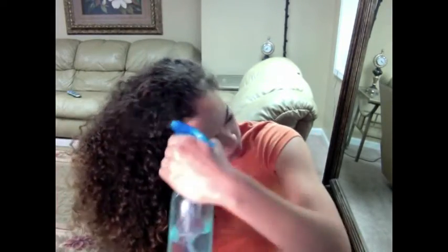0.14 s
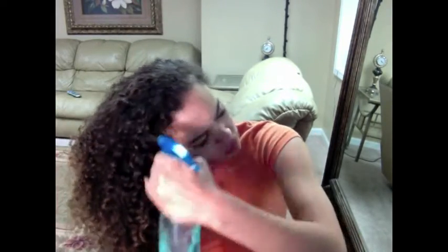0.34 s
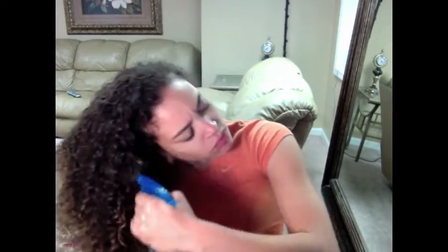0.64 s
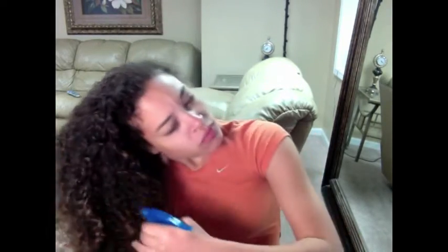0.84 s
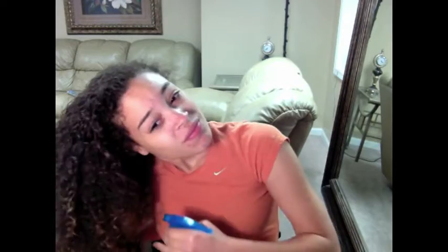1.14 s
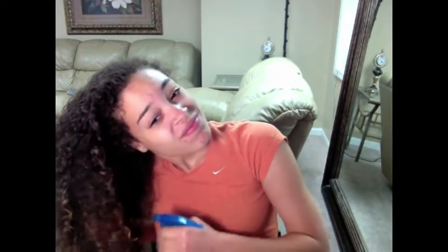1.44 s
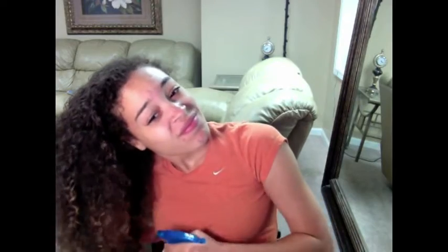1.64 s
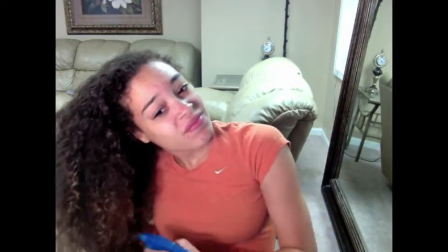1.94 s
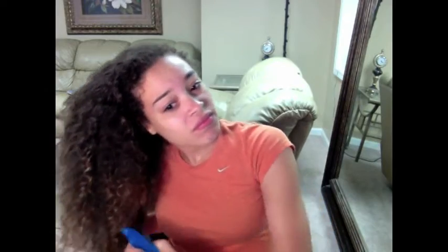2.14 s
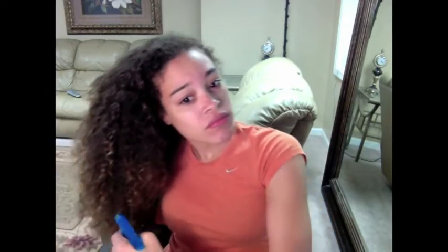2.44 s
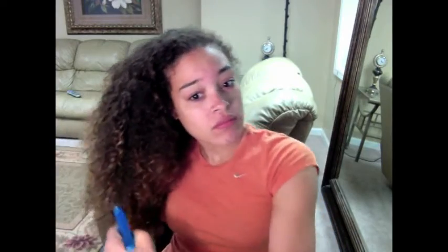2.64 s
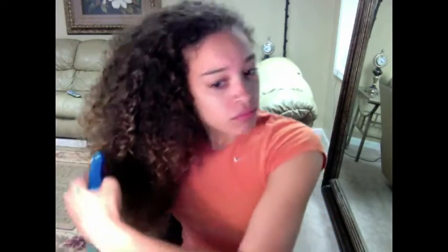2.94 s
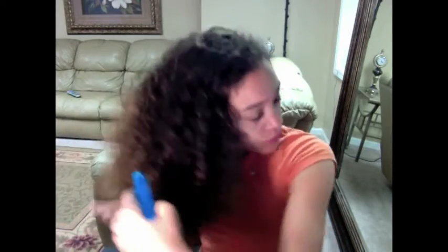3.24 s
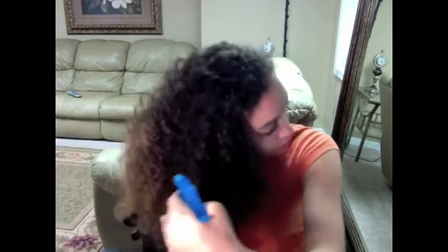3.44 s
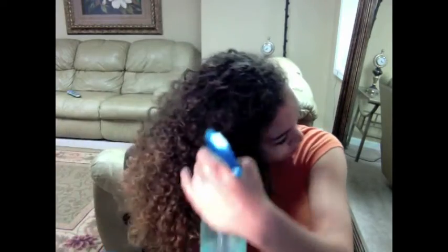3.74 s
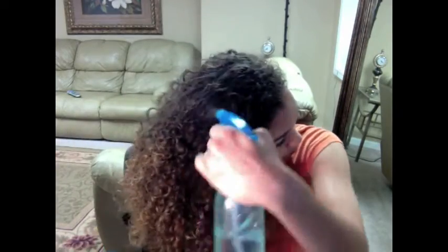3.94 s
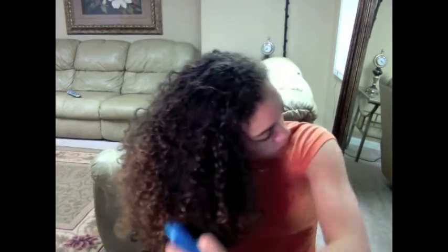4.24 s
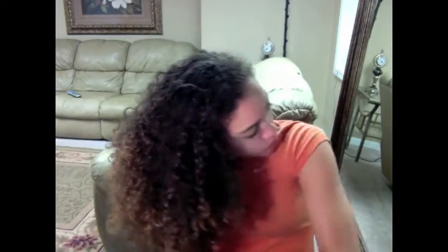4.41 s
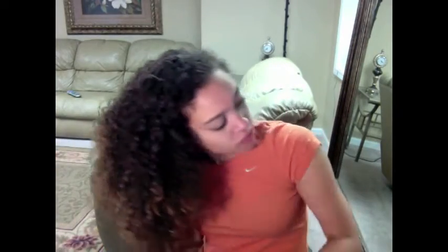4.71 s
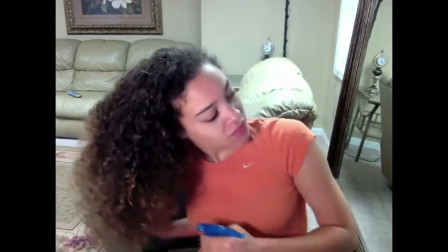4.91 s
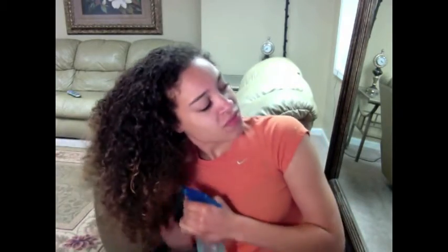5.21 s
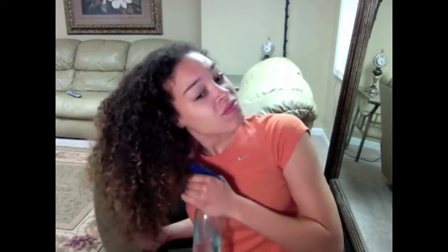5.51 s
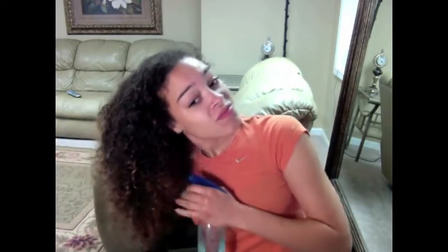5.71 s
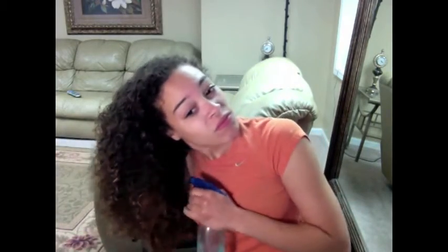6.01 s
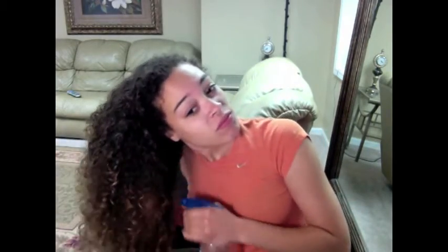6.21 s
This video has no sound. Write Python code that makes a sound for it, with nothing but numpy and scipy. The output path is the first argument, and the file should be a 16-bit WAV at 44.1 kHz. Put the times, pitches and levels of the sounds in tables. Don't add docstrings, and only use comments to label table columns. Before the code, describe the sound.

In a quiet living room, a plastic spray bottle is pumped quickly close to a small microphone. Each stroke clacks the trigger, thumps the hollow bottle and releases a short wet hiss. After about ten strokes there is a pause with soft rustling and a bump as the bottle changes hands, then a squeak and more uneven squirts. A low appliance hum stays underneath.

```python
import sys
import numpy as np
from scipy import signal
from scipy.fft import rfft, irfft, next_fast_len
from scipy.io import wavfile
from scipy.ndimage import uniform_filter1d, map_coordinates

SR = 44100
rng = np.random.default_rng(int(sys.argv[2]) if len(sys.argv) > 2 else 0)


def int16_out(signal):
    q = np.round(np.clip(np.atleast_2d(signal).T, -1, 1) * 32767)
    wavfile.write(sys.argv[1], SR, q.astype(np.int16))


def linear_from_db(decibels):
    return 10 ** (np.asarray(decibels, float) / 20)


N = 280476
TOP_HZ = 16050
BURST = 4096

# pitch_hz, level_db
ROOM_AIR = [(15, -73), (25, -39), (81, -13), (103, -13), (119, -16), (147, -6.5), (229, -11.5), (258, -15),
            (312, -9.5), (444, -17.5), (1910, -25.5), (2540, -33), (2930, -31), (3140, -26), (7000, -43),
            (9100, -65), (15400, -120)]
AIR_DB, AIR_FOLLOWS = -68.5, 0.45
# pitch_hz, level_db
FAN_WHINE = [(2780, -34), (2900, -1), (3030, -27)]
# pitch_hz, level_db
MIC_HISS = [(2000, 1), (4000, -1), (9000, -4.5), (13500, -5), (14800, -11), (15300, -24)]
HUM_HZ = 117.6
# pitch_hz, time_to_fall_60_db_s
ECHO_TIMES = [(300, 0.28), (2000, 0.28), (10000, 0.27)]

# time_s, level_db
ARM_STIR = [(0, -70), (1, -70), (2, -71.5), (2.599, -65.5), (2.8, -67.5), (2.95, -68), (3.1, -63),
            (3.2, -71), (3.3, -80), (3.5, -79), (3.8, -68.5), (4.5, -69.5), (4.7, -72.5), (4.85, -68),
            (5.1, -66.5), (5.7, -68.5), (6.101, -69), (6.36, -66.5)]
# pitch_hz, level_db
CLOTH_COLOUR = [(300, -15.5), (800, -4), (1500, -3.5), (3000, -6.5), (6000, -14.5), (10000, -23),
                (14500, -40), (15200, -50)]

# start_s, peak_db, pitch_hz
BOTTLE_KNOCKS = [(0.266, -48.5, 970), (0.537, -50, 940), (2.008, -47.5, 1990), (2.715, -49.5, 1420),
                 (3.709, -46.5, 1250), (3.974, -51, 980), (4.221, -47.5, 1210), (4.462, -47.5, 1880),
                 (4.608, -55.5, 2000), (4.672, -55, 1710), (4.735, -50.5, 1220), (5.04, -49.5, 1090),
                 (5.088, -53, 1500), (5.666, -49, 1200), (5.734, -45, 1010), (5.773, -49, 1040),
                 (5.949, -46.5, 1420), (6.105, -53, 2020)]
KNOCK_S_PER_KHZ, KNOCK_OCTAVES = 0.0085, 0.91
# start_s, peak_db, pitch_hz, length_s, width_octaves
HARD_BLOWS = [
    (.683, -28.5, 1660, 0.012, 0.62),
    (.683, -28, 3350, 0.01, .55),
    (1.3195, -28.5, 1370, .009, 0.57),
    (1.3195, -25, 2730, 0.0093, 0.66),
]
# start_s, peak_db, pitch_hz, length_s, width_octaves
HAND_BUMPS = [
    (3.0845, -34, 910, 0.0065, 1),
    (3.087, -32.5, 1335, 0.0064, 0.44),
    (3.092, -45, 330, 0.0067, 0.96),
    (3.104, -48.5, 233, 0.017, 0.81),
    (3.112, -57, 1190, 0.028, 0.55),
]

# start_s, peak_db, pitch_hz, length_s
VALVE_SPITS = [(0.0044, -39, 2960, 0.014), (0.171, -39, 10400, 0.029), (0.204, -42.5, 6700, 0.017),
               (0.395, -39, 5420, .016), (0.479, -35, 11600, 0.0064), (0.67, -35, 8100, 0.014),
               (0.72, -23.5, 7940, 0.014), (0.965, -32, 7080, 0.012), (1.584, -33.5, 6300, 0.014),
               (1.704, -41.5, 8700, 0.012), (3.6447, -25, 7580, .019), (3.713, -42, 5250, 0.022),
               (3.947, -39.5, 9200, 0.014), (4.0684, -28.5, 6600, 0.014), (4.469, -38.5, 9600, 0.0077),
               (4.897, -37, 8100, 0.011), (4.92, -32.5, 10600, .01), (4.999, -31, 9070, 0.0091),
               (5.049, -46.5, 5550, 0.018), (5.314, -29.5, 7600, 0.021), (5.3545, -40.5, 5340, 0.027),
               (5.674, -41.5, 6500, 0.0062), (5.93, -46, 9250, 0.011), (6.111, -44, 6700, .008)]
VALVE_OCTAVES = 1
# start_s, peak_db, pitch_hz
SPRING_TICKS = [(0.282, -53.5, 7870), (0.5192, -40.5, 8000), (0.552, -44, 6690), (1.036, -31.5, 9550),
                (1.431, -45.5, 8700), (1.475, -46.5, 7540), (1.673, -39, 7500), (1.753, -48.5, 6650),
                (2.021, -43, 6650), (2.254, -44.5, 6580), (2.471, -49, 7930), (2.67, -44, 7070),
                (2.7178, -41, 6580), (4.227, -42, 6770), (4.7805, -49, 6850), (4.818, -48.5, 8100),
                (5.2567, -32, 8120), (5.6171, -45.5, 5340), (5.731, -50, 6000), (5.875, -51, 8200),
                (5.892, -48, 10500), (6.22, -33.5, 8400)]
SPRING_S, SPRING_OCTAVES = 0.0091, 0.59
# start_s, peak_db, pitch_hz
HINGE_CREAKS = [(1.135, -48, 3430), (1.2, -55.5, 3070), (1.976, -50, 3010), (2.779, -47, 2950),
                (3.085, -49.5, 2560), (4.606, -67, 3300), (3.9845, -40, 4260), (4.671, -57.5, 3240),
                (4.737, -50, 3520), (4.855, -57, 3260), (5.762, -41.5, 4200)]
HINGE_S, HINGE_OCTAVES = 0.0098, 0.99
# start_s, peak_db, pitch_hz
BALL_CHIRPS = [
    (3.501, -38.5, 2200),
    (3.6, -42, 4200),
    (4.204, -49, 9700),
    (3.7, -38, 5370),
    (6.0022, -24.5, 6750),
    (6.0015, -27, 12800),
]
BALL_S, BALL_OCTAVES = 0.0095, 0.25
# start_s, level_db, start_pitch_hz, end_pitch_hz, time_to_fall_60_db_s
SEAL_SQUEAKS = [
    (3.503, -47, 2150, 2060, .2),
    (3.948, -46, 4200, 4150, .06),
]

# start_s, peak_db, bottle_thump_db, length_s
TRIGGER_CLACKS = [(0.1263, -34.5, -29, 0.019), (0.365, -37.5, -38, 0.024), (0.636, -36.5, -30, 0.021),
                  (0.9236, -37.5, -23, 0.019), (1.2438, -38, -34.5, 0.019), (1.5567, -33.5, -23.5, 0.015),
                  (1.838, -35.5, -24, 0.014), (2.087, -36.5, -23.5, 0.021), (2.312, -35.5, -20.5, 0.017),
                  (2.5482, -37, -23.5, 0.021), (3.5017, -36.5, -66, 0.0072), (3.8024, -29.5, -35, 0.0092),
                  (4.0577, -32, -27, 0.018), (4.2995, -35, -24, 0.02), (5.1543, -37, -26.5, 0.016),
                  (5.465, -36, -25.5, 0.015), (6.1928, -33, -22, 0.014)]
# pitch_hz, level_db
HEAD_COLOUR = [(470, -7.5), (800, -18.5), (1050, -4.5), (3690, -5), (5240, -0.5), (6490, -3.5), (8340, -2),
               (14700, -13.5), (16000, -31)]
# pitch_hz, width_hz, level_db
BOTTLE_TONES = [(317.7, 26, 5.5), (531, 48, 0.5), (654, 25, -1.5), (1040, 30, 3), (1420, 23, -14),
                (1550, 135, -0.5), (2054, 35, -3.5), (2380, 100, -10)]
TILT_DB, TILT_PER_THUMP = -0.5, -0.014

# start_s, swell_s, hold_s, hiss_db, wet_over_hiss_db
MIST_SQUIRTS = [(-.03, 0.02, .031, -48.5, -1), (0.125, 0.011, 0.06, -55, -8.5),
                (0.387, 0.019, .07, -55, -7), (0.662, 0.028, .062, -47, -1.5),
                (0.931, .046, .06, -51.5, 1.2), (1.259, .068, .055, -50.5, 4.5),
                (1.565, .04, .05, -50, 0.9), (1.853, .028, .04, -52, 3.5), (2.101, .044, .034, -53, 1.9),
                (2.323, .032, 0.02, -55.5, 4), (2.562, 0.028, 0.025, -57, 0.5),
                (3.5, 0.088, 0.089, -56.5, -1), (3.805, .047, .047, -53.5, 1.4),
                (4.08, 0.019, .05, -52.5, -1.5), (4.306, 0.039, .028, -55.5, 3.1),
                (4.821, 0.1, 0.031, -48, -1.8), (5.155, .067, 0.051, -53, 3.3),
                (5.475, 0.054, 0.056, -54.5, 0.7), (5.744, 0.018, .006, -58.5, 7),
                (5.893, .075, 0.041, -51.5, -1), (6.201, .043, 0.048, -50.5, 3)]
# pitch_hz, level_db
WET_COLOUR = [(600, -26), (1000, -4), (1500, -0.5), (2200, 4.5), (3000, 2), (4500, 2), (7000, -4),
              (12000, -20.5)]
# pitch_hz, level_db
HISS_COLOUR = [(2500, -9.5), (4500, -12.5), (6500, 1.5), (9000, -2.5), (12000, -6.5), (14500, -16),
               (16000, -15)]
# pitch_hz, width_hz, boost_db
NOZZLE_TONES = [(1426, 86, 8.5), (3070, 50, 2), (4180, 100, 2), (5300, 70, 5), (6990, 90, -1),
                (8540, 370, 0.5), (9800, 620, 3)]
SAG_S = 0.22


def unit(x):
    return x / np.sqrt(np.mean(x ** 2, axis=-1, keepdims=True) + 1e-20)


def along(points, hz):
    f, level_db = np.transpose(points)
    return np.interp(np.log(hz + 1), np.log(f + 1), level_db, left=-120, right=-120)


def wobble(rate):
    knots = rng.standard_normal(int(N * rate / SR) + 4)
    return map_coordinates(knots, [np.arange(N) * rate / SR])


def filtered(x, response):
    m = next_fast_len(x.shape[-1] + 8192)
    spectrum = rfft(x, m) * response(np.fft.rfftfreq(m, 1 / SR))
    return irfft(spectrum, m)[..., :x.shape[-1]]


def resonance(f, centre, width):
    return 1j * f * width / (centre ** 2 - f * f + 1j * f * width)


def rush(spectrum, patchy_db, size=8):
    z = signal.stft(rng.standard_normal(N + 512), nperseg=256)[2]
    field = uniform_filter1d(rng.standard_normal(z.shape), size=2, axis=0)
    field = uniform_filter1d(field, size=size, axis=1)
    patches = signal.istft(z * linear_from_db(patchy_db * field / field.std()), nperseg=256)[1][:N]
    return unit(filtered(patches, lambda hz: linear_from_db(along(spectrum, hz))))


def rattle(length, rise, fall):
    t = np.arange(BURST) / SR
    held = np.abs(length)[:, None]
    bumps = uniform_filter1d(rng.standard_normal((len(held), BURST)), size=90, axis=1)
    fade_db = 60 * np.clip(t - held, 0, None) / fall + 3 * t / held
    return (1 - np.exp(-t / rise)) ** 2 * linear_from_db(2 * unit(bumps) - fade_db)


def placed(times, bursts):
    starts = np.round(np.asarray(times) * SR).astype(int).clip(0)
    at = starts[:, None] + np.arange(BURST)
    return np.bincount(at.ravel(), bursts.ravel(), N + BURST)[:N]


def stir_db():
    return np.interp(np.arange(N) / SR, *np.transpose(ARM_STIR))


def room_tone():
    phase = 2 * np.pi * np.cumsum(HUM_HZ + 1.57 * wobble(7.1)) / SR
    hum = linear_from_db(-66 + wobble(3.8)) * np.sin(phase)
    stir = uniform_filter1d(stir_db(), size=SR // 4) - stir_db().mean()
    air_db = AIR_DB + AIR_FOLLOWS * stir + 0.2 * wobble(0.88)
    air = linear_from_db(air_db) * rush(ROOM_AIR, patchy_db=0.55)
    whine = linear_from_db(-87.5) * rush(FAN_WHINE, patchy_db=-4)
    hiss = linear_from_db(-85) * rush(MIC_HISS, patchy_db=-4)
    return hum + whine + air + hiss


def walls(x):
    hz, t, z = signal.stft(rng.standard_normal(SR // 2), SR, nperseg=256)
    t60 = np.interp(hz, *np.transpose(ECHO_TIMES))[:, None]
    tail = signal.istft(z * linear_from_db(-60 * t / t60), SR, nperseg=256)[1]
    return signal.fftconvolve(x, tail / np.linalg.norm(tail))[:N]


def rustle():
    level_db = stir_db() + 1.4 * wobble(19)
    return linear_from_db(level_db) * rush(CLOTH_COLOUR, patchy_db=1.2)


def taps(table, ring_db, ring_hz, rise, fall, crack_db):
    s, db, centre, length, octaves = (c[:, None] for c in np.transpose(table))
    chatter = rng.standard_normal((len(s), BURST))
    spread = rng.uniform(-1.5, 1.5, (len(s), 6)) * (np.arange(6) > 0)
    parts = centre * 2 ** (octaves * spread)
    strengths = [1, 0.6, 0.6, 0.5, 0.5, 0.5]

    def colour(f):
        broad = np.exp(-0.5 * (np.log2((f + 1) / centre) / octaves) ** 2)
        rings = sum(g * resonance(f, p[:, None], ring_hz) for p, g in zip(parts.T, strengths))
        return broad * (1 + linear_from_db(ring_db) * rings)

    body = unit(filtered(chatter, colour)) * rattle(length[:, 0], rise, fall)
    cycles = np.arange(BURST) / SR * centre - 2
    crack = linear_from_db(crack_db) * np.sin(2 * np.pi * cycles) * np.exp(-2 * cycles ** 2)
    return placed(s[:, 0] - 0.002, linear_from_db(db - 8.5) * (body - crack))


def bottle_contacts():
    light = [(s, db, hz, KNOCK_S_PER_KHZ * hz / 1000, KNOCK_OCTAVES) for s, db, hz in BOTTLE_KNOCKS]
    knocks = taps(light, ring_db=8, ring_hz=120, rise=0.0012, fall=0.04, crack_db=3)
    blows = taps(HARD_BLOWS, ring_db=2, ring_hz=300, rise=0.0005, fall=0.025, crack_db=12)
    bumps = taps(HAND_BUMPS, ring_db=12, ring_hz=90, rise=0.002, fall=0.05, crack_db=2)
    return knocks + blows + bumps


def pump_ticks():
    valve = [(*row, VALVE_OCTAVES) for row in VALVE_SPITS]
    spring = [(*row, SPRING_S, SPRING_OCTAVES) for row in SPRING_TICKS]
    hinge = [(*row, HINGE_S, HINGE_OCTAVES) for row in HINGE_CREAKS]
    ball = [(*row, BALL_S, BALL_OCTAVES) for row in BALL_CHIRPS]
    parts = valve + spring + hinge + ball
    return taps(parts, ring_db=11, ring_hz=220, rise=0.0018, fall=0.035, crack_db=0)


def squeak():
    s, db, start_hz, end_hz, t60 = (c[:, None] for c in np.transpose(SEAL_SQUEAKS))
    t = np.arange(BURST) / SR
    pitch = end_hz + (start_hz - end_hz) * np.exp(-t / 0.02) + 60 * wobble(300)[:BURST]
    level_db = db - 60 * t / t60 + 2.5 * wobble(200)[:BURST]
    note = np.sin(2 * np.pi * np.cumsum(pitch, axis=1) / SR) * linear_from_db(level_db)
    return placed(s[:, 0], note * signal.windows.tukey(BURST, 0.06))


def clacks():
    s, db, thump_db, length = np.transpose(TRIGGER_CLACKS)
    tilt_db = TILT_DB + TILT_PER_THUMP * (thump_db - thump_db.mean())
    chatter = rng.standard_normal((len(s), 2, BURST))
    grip = rng.standard_normal((len(s), 40))

    def head(hz):
        uneven_db = 4 * np.array([np.interp(hz, np.linspace(0, TOP_HZ, len(g)), g) for g in grip])
        tilted_db = tilt_db[:, None] * np.log2((hz + 1) / 4000)
        return linear_from_db(along(HEAD_COLOUR, hz) + uneven_db + tilted_db)

    def wall(f):
        return sum((-1) ** k * linear_from_db(d) * resonance(f, c, w) for k, (c, w, d) in enumerate(BOTTLE_TONES))

    plastic = unit(filtered(chatter[:, 0], head)) * rattle(length, rise=0.0036, fall=0.081)
    thump = filtered(chatter[:, 1] * rattle(0.36 * length, rise=0.00068, fall=0.061), wall)
    thump = thump / np.abs(thump).max(axis=1, keepdims=True)
    on_head = placed(s - 0.006, linear_from_db(db - 7)[:, None] * plastic)
    on_wall = placed(s + 0.003006, linear_from_db(db + thump_db + 18)[:, None] * thump)
    return on_head + on_wall


def droplets(pressure, count, size_db):
    draws = rng.uniform(size=(count, 3))
    at = np.searchsorted(np.cumsum(pressure) / pressure.sum(), draws[:, 0]).clip(0, N - 1)
    pitch_hz = 4000 + 10500 * draws[:, 1:2]
    t = np.arange(BURST) / SR
    pings = np.sin(2 * np.pi * pitch_hz * t) * (1 - np.exp(-t / 0.002)) * np.exp(-t / 0.005)
    strength = pressure[at] * linear_from_db(size_db + 10 * draws[:, 2])
    return placed(at / SR, pings * strength[:, None])


def mist():
    s, swell, hold, hiss_db, over_db = (c[:, None] for c in np.transpose(MIST_SQUIRTS))
    t = np.arange(N) / SR - s
    growth = np.sin(np.pi / 2 * np.clip(t / swell, 0, 1)) ** 2
    pressure = growth * linear_from_db(-60 * np.clip(t - swell - hold, 0, None) / SAG_S)
    wet_level = (linear_from_db(hiss_db + over_db) * pressure).sum(axis=0)
    hiss_level = (linear_from_db(hiss_db) * pressure).sum(axis=0)
    wet = wet_level * rush(WET_COLOUR, patchy_db=2.6, size=30)
    hiss = hiss_level * rush(HISS_COLOUR, patchy_db=2.8, size=30)
    jet = wet + hiss + droplets(hiss_level, count=450, size_db=-7)
    splutter = linear_from_db(wobble(40) + wobble(170))

    def nozzle(f):
        boost_db = sum(db / (1 + ((f - hz) / w) ** 2) for hz, w, db in NOZZLE_TONES)
        return linear_from_db(boost_db - 1.5)

    return filtered(splutter * jet, nozzle)


def scene():
    hits = clacks() + pump_ticks() + bottle_contacts() + squeak()
    echoes = linear_from_db(-10) * walls(hits)
    return (room_tone() + rustle() + hits + echoes + mist())[None]


def roll_off(x):
    return signal.sosfilt(signal.butter(12, 16450, fs=SR, output="sos"), x)


def record(dry):
    def microphone(hz):
        bass_loss = np.sqrt(1 + (35 / (hz + 1)) ** 4)
        treble_loss = np.sqrt(1 + (hz / 15000) ** 16)
        top_edge = np.clip((TOP_HZ - hz) / 300, 0, 1) ** 2
        return top_edge / bass_loss / treble_loss

    mix = filtered(dry, microphone)
    return roll_off(mix)


dry = scene()
out = record(dry)
int16_out(out)
```